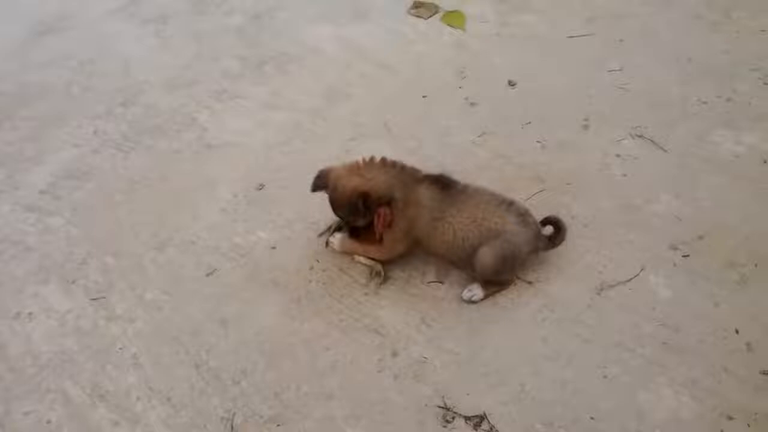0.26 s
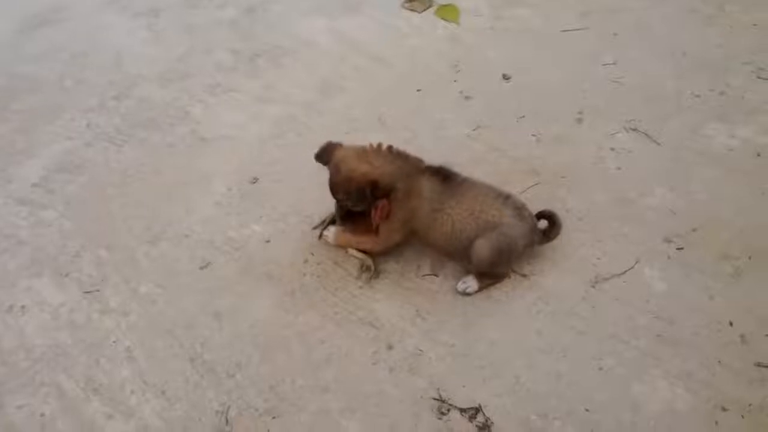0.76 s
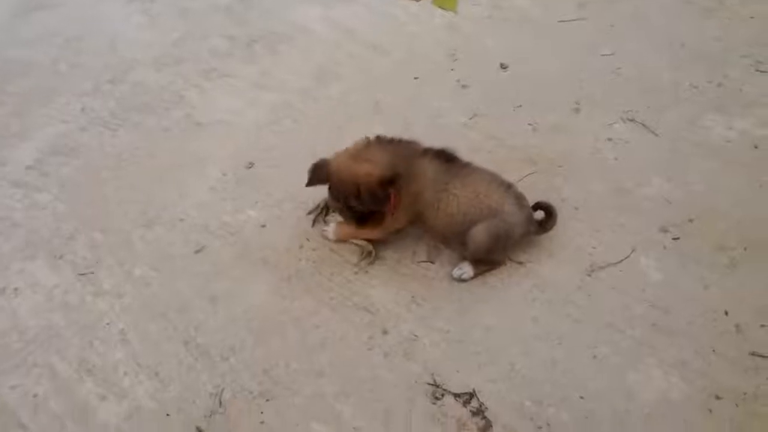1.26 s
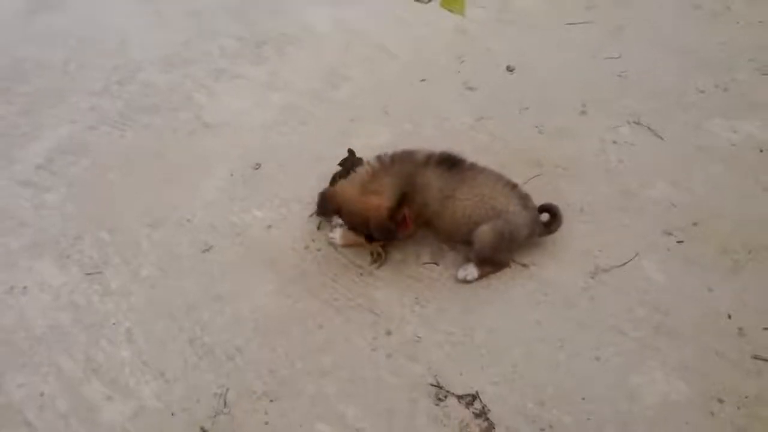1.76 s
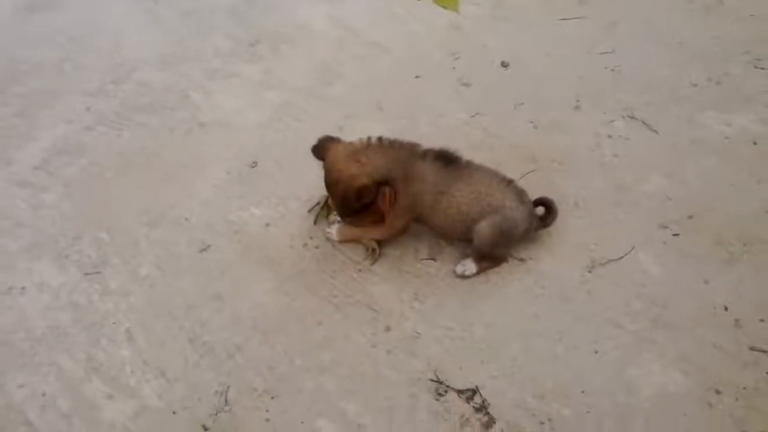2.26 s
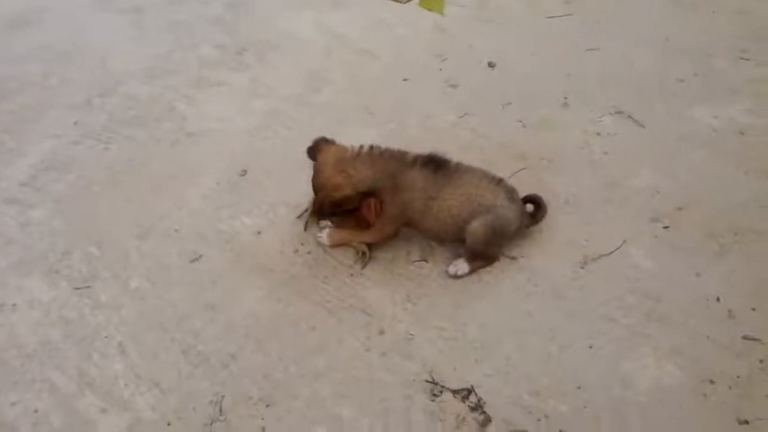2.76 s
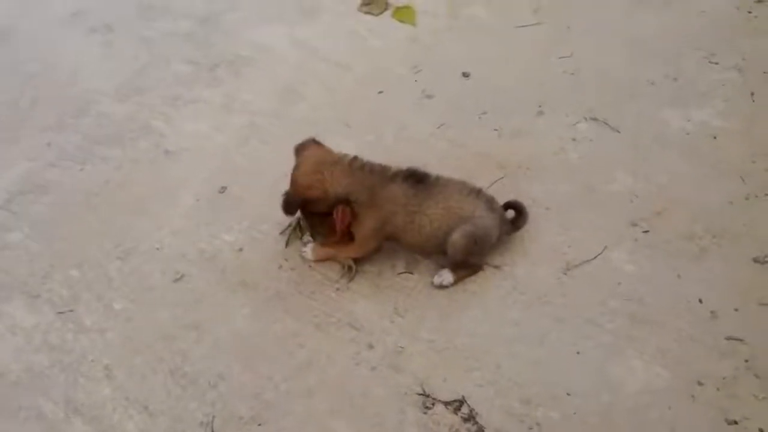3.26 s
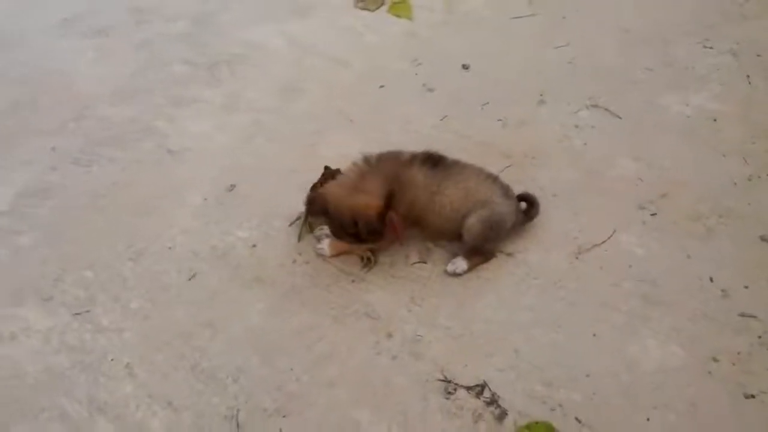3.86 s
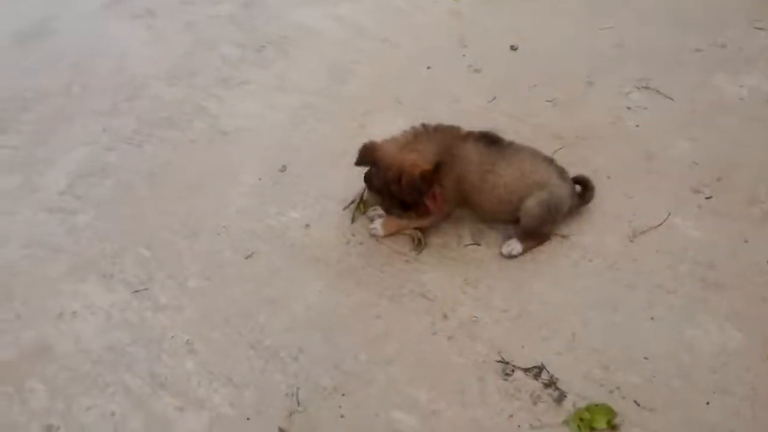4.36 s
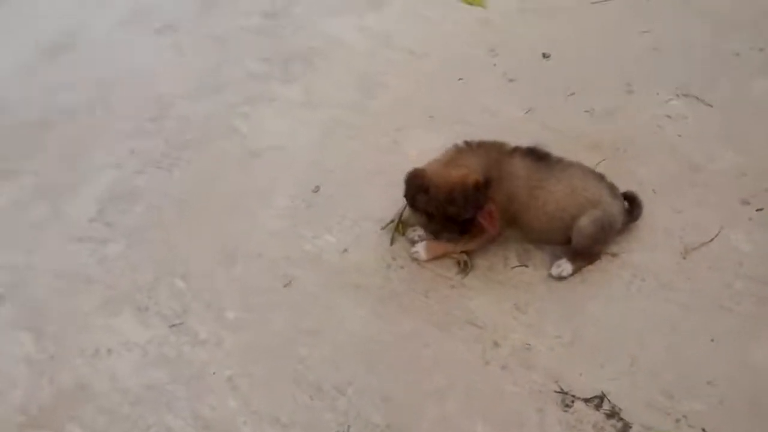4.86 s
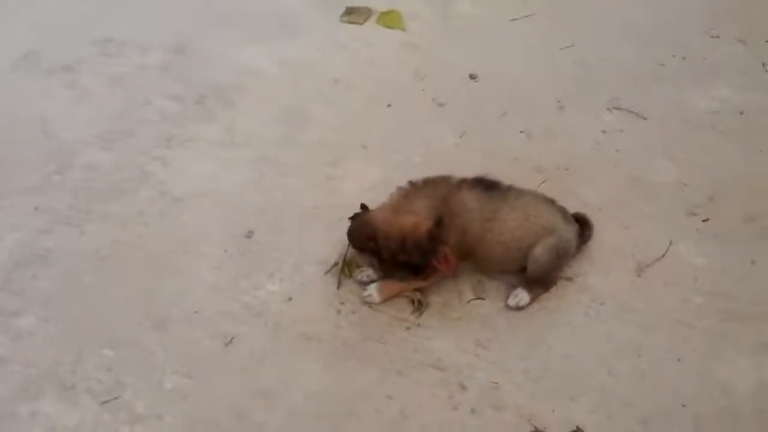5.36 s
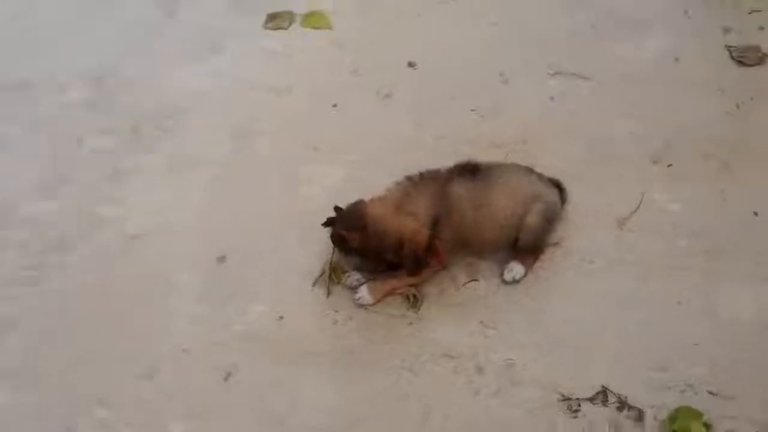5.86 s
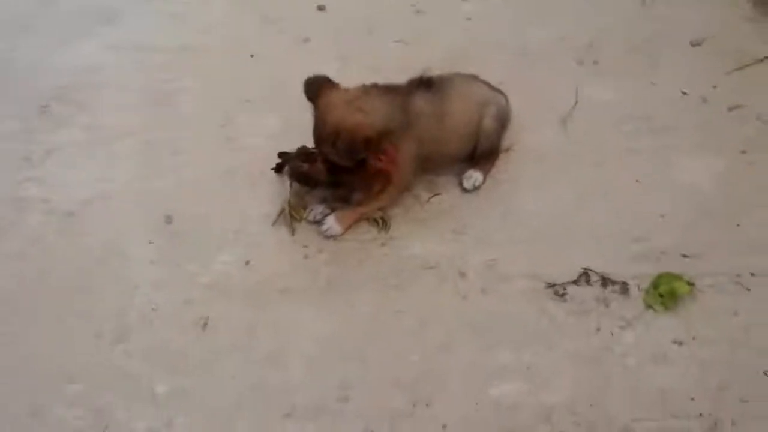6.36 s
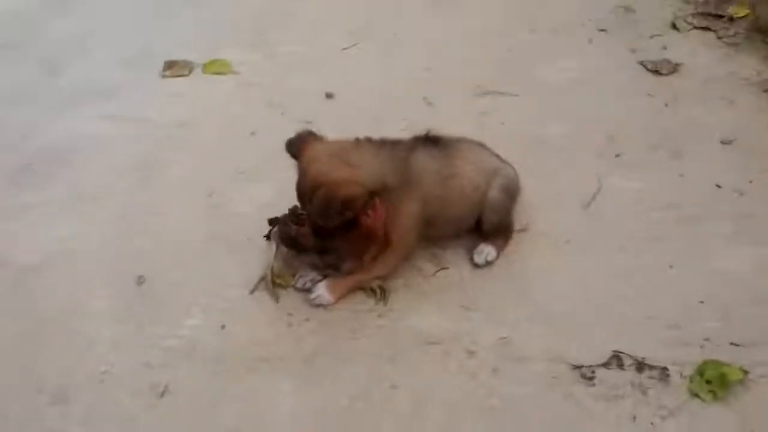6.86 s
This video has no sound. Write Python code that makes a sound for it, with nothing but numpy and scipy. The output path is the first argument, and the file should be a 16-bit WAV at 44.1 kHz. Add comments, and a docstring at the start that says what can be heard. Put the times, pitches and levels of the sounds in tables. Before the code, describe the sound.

Quiet open yard with faint high insect trilling and soft air rumble. A heavy dull thump repeats steadily, a bit more than once a second. After three seconds a rooster pinned by a puppy yelps, screams and gives a long cracking wail, nearby and loud. Then only thuds, tiny clicks and feather rustles remain. Handheld microphone outdoors, short echoes.

```python
"""Insects trill over quiet outdoor air, each a band of noise throbbing at the wing rate; scuffs are grainy noise.
Something heavy is pounded steadily some way off, as pressure pulses with damped modes; small birds glide faintly.
Then a rooster, held down by a puppy on a concrete road, squawks three times: a yelp, a scream and a long wail.
Its pulsed voice flips between a low and a high register, through resonances of windpipe and beak.
Around and after the calls teeth, claws, feathers and paws tick and rustle as filtered noise bursts."""
import sys
import numpy as np
from scipy import signal
from scipy.fft import rfft, irfft, next_fast_len
from scipy.io import wavfile
from scipy.ndimage import uniform_filter1d

SR = 44100
rng = np.random.default_rng(int(sys.argv[2]) if len(sys.argv) > 2 else 0)


def transcribe(u):
    """Save the signal u as a 16-bit wav file named by the first command-line argument.

    u: samples, shape (n,) or (channels, n), limited to [-1, 1]; the rate is SR.
    q: integer samples, one column per channel.
    """
    v = np.clip(np.atleast_2d(u).T, -1, 1)
    q = np.round(v * 32767).astype(np.int16)
    wavfile.write(sys.argv[1], SR, q)


N = 313992
TIME = np.arange(N) / SR
EDGE_HZ = 15800  # upper band limit

# Spectrum of the outdoor air. Each row: frequency in Hz, relative density in dB per Hz.
AIR_SPECTRUM = [(12, -50), (20, 1), (43, -2), (90, -3), (234, -5.5), (459, -12), (923, -18.5),
                (3630, -24.5), (5380, -25), (6700, -19.5), (7700, -24), (9140, -28), (12800, -23.5),
                (16000, -23.5)]
AIR_DB = -55
# Reverberation of the yard. Each row: frequency in Hz, time to fall by 60 dB in seconds.
YARD_DECAY = [(80, 0.5), (300, 0.49), (800, 0.21), (2000, 0.32), (5000, 0.34), (14000, 0.071)]
# Bouts of the main insect. Each row: start in seconds, end in seconds.
TRILL_BOUTS = [(-.2, 1.9), (2.5, 6.8), (6.85, 8.7)]
# Bouts of a thinner insect rasp. Each row: start in seconds, end in seconds.
THIN_TRILL_BOUTS = [(.5, 0.81), (2.5, 3.4)]
BOUT_EDGE_S = 0.035
# Whistles of small far birds. Each row: start in seconds, length in seconds, start and end pitch in Hz.
BIRD_CHIRPS = [(0.57, 0.078, 815, 770), (1.348, 0.053, 2770, 3450), (1.48, 0.14, 3390, 2900),
               (1.838, 0.096, 4350, 4800), (6.331, 0.06, 3090, 3560), (6.653, .14, 7600, 7250)]
CHIRP_DB = -64.5

# Distant blows. Each row: time in seconds, level in dB, pitch of the push in Hz, hardness in dB,
# rebound in dB relative to the blow.
BLOWS = [(0.278, -17.5, 115, 3, -15), (1.1612, -20.5, 105, -4.5, -12), (2.054, -26, 89, -11, -7),
         (2.942, -21, 105, -5.5, -23), (3.8298, -21, 106, 7, -14.5), (4.7001, -22, 109, 3.5, -18),
         (5.5962, -19.5, 118, 6, -24), (6.494, -18.5, 111, -8, -11.5)]
# Modes of the struck body. Each row: highest frequency in Hz, level in dB before hardness,
# time to fall by 60 dB in seconds.
BLOW_MODES = [(77.4, -10, 0.21), (170, -29, 0.025), (262.6, -14.5, 0.11), (417.6, -19.5, 0.13)]
REBOUND_S = 0.055  # delay of the rebound
KNOCK_DB, RING_SHARE = -24, 0.16  # a hard blow knocks more; this share of its hardness also goes to the ring

# Scuffs of feathers and paws. Each row: centre in seconds, level in dB, length in seconds,
# grit from 0 (soft swish) to 1 (coarse).
SCUFF_EVENTS = [(0.033, -42.5, .015, 0.01), (1.07, -56, 0.065, 0.1), (2.99, -49.5, 0.021, 0.45),
                (4.841, -40, 0.025, 0.45), (5.906, -45.5, 0.022, 0.77), (5.986, -47.5, 0.048, 0.74),
                (6.082, -45.5, 0.051, 0.53), (6.1, -34.5, 0.01, 0.41), (6.442, -45.5, 0.011, 0.1),
                (6.511, -42.5, 0.1, 0.49)]
# Spectra of feathers and of grit. Each row: frequency in Hz, relative gain in dB.
SWISH_SPECTRUM = [(300, -8), (2000, -42), (4000, -16.5), (8000, -7), (11000, 1), (14500, 8.0), (16000, 1)]
GRAVEL_SPECTRUM = [(100, 15.5), (900, 6.5), (2500, 2), (4300, 4.5), (6000, -5.0), (15000, -10.5)]
# Sharp clicks of teeth and claws. Each row: time in seconds, peak in dB, centre in Hz,
# width in octaves, decay of the burst in seconds.
TOOTH_CLICKS = [(2.667, -26.5, 13300, 1.6, .0014), (2.981, -18.5, 14600, 0.48, 0.00093),
                (3.367, -32.5, 12000, 2.1, 0.00094), (5.847, -37, 10060, 1.1, .001),
                (5.912, -28.5, 5900, 0.95, .0012), (6.0469, -22, 12500, 2.1, 0.00042),
                (6.1025, -11.5, 12000, 0.75, .00008), (6.155, -29.5, 12000, .4, 0.0016),
                (6.435, -40, 12000, 1.2, .0012), (7.0561, -25, 12500, 1.4, 0.00078)]
# Pitched pops and squeaks of quills and beak. Each row: time in seconds, peak in dB,
# frequency in Hz, decay of the burst in seconds.
QUILL_POPS = [(3.525, -27.5, 3430, 0.0087), (4.661, -34, 5420, 0.0037), (6.103, -33.5, 890, 0.0016),
              (6.155, -42.5, 4150, .002), (6.435, -34.5, 557, 0.0013), (6.6, -41.5, 1810, 0.0023),
              (6.648, -48, 1310, 0.0032), (6.998, -45, 1930, 0.0023)]
POP_SPREAD = 0.6  # width in Hz times decay in s: the longer it rings, the purer

# Low-register pitch of the yelp, which also stands for strain. Each row: time in seconds, pitch in Hz.
YELP_PITCH = [(3.083, 739), (3.11, 737.4), (3.135, 714.4), (3.168, 671), (3.185, 609), (3.245, 615)]
# The same for the scream. Each row: time in seconds, pitch in Hz.
SCREAM_PITCH = [(3.393, 599), (3.426, 629.3), (3.44, 746.5), (3.478, 770), (3.5, 733), (3.535, 755),
                (3.61, 740.6), (3.67, 761.4), (3.824, 751.2)]
# The same for the wail. Each row: time in seconds, pitch in Hz.
WAIL_PITCH = [(3.95, 616), (4.07, 612.7), (4.1, 633.5), (4.16, 719.6), (4.19, 731.4), (4.25, 707.4),
              (4.49, 695.6), (4.54, 712), (4.565, 729), (4.74, 727.7), (4.778, 628.6), (4.875, 599.5),
              (5.0, 588), (5.065, 617), (5.185, 640), (5.24, 686), (5.28, 637), (5.312, 691),
              (5.405, 702.5), (5.455, 630.3), (5.51, 526)]
# Resonances of windpipe and beak. Each row: frequency in Hz, width in Hz, relative gain in dB.
THROAT_MODES = [(770, 350, 12.5), (1432, 360, -18.5), (1810, 193, -12), (2680, 245, -22), (2975, 200, -8),
                (3240, 700, -17.5), (4083, 650, -6.5), (4650, 90, -14), (6760, 1400, -21.5),
                (8450, 1420, -23.5), (9870, 810, -22), (12040, 2700, -23), (14100, 1400, -20),
                (14600, 700, -38)]
# Resonances with the beak gaping widest. Each row: frequency in Hz, width in Hz, relative gain in dB.
WIDE_THROAT_MODES = [(819, 286, 23), (1400, 840, 0.5), (1997, 360, -5), (3450, 320, -32),
                     (4360, 1070, -24.5), (5130, 85, -32), (6140, 530, -33.5), (8250, 2550, -36.5),
                     (9700, 440, -42), (12000, 3700, -37), (14800, 1500, -36.5)]
# Level law of the fundamental. The row: low register in dB at STRAIN_HZ, its rise in dB per Hz of pitch,
# high register in dB.
FUNDAMENTAL_LAW = (-33.5, 0.21, -31)
# Level law of the middle overtones. The row: low register in dB, rise in dB per Hz, high register in dB.
MID_LAW = (-42, 0.082, -37.8)
# Level law of the shrill overtones. The row: low register in dB, rise in dB per Hz, high register in dB.
SHRILL_LAW = (-41, 0.043, -39)
STRAIN_HZ, SLACK_HZ = 700, 587  # reference pitch; pitch below which the voice gets no softer
# Leaps into the high register. Each row: start in seconds, end in seconds, roughness from 0 to 1,
# force of the fundamental in dB.
REGISTER_LEAPS = [(3.07, 3.101, 0.66, -6), (3.513, 3.531, 0.05, 6.5), (4.168, 4.511, .055, 0),
                  (4.553, 4.619, 0.26, 0.5), (4.651, 4.712, 0.31, -2.5), (4.743, 4.757, 0.6, -6),
                  (5.338, 5.391, 0.49, -8)]
LEAP_SHARE, FLIP_S = 0.216, 0.0025  # relative rise in pitch; time scale of a flip
FLIP_ROUGH, UNSTEADY_S = 0.23, 0.022  # added roughness around each flip, and its decay time
# Hoarse stretches, where the membranes lose their regular beat. Each row: start in seconds,
# end in seconds, roughness from 0 to 1, swell in dB.
HOARSE_STRETCHES = [(3.084, 3.26, 0.26, -3), (3.393, 3.431, 0.44, 0), (3.563, 3.84, 0.32, -2),
                    (3.944, 4.055, 0.92, 13), (4.756, 4.789, 0.44, 0), (4.916, 5.025, 0.7, 8.5),
                    (5.459, 5.496, 0.35, 12)]
HOARSE_EDGE_S = 0.0074
CRACK_S, CRACK_DIP_DB, CRACK_SPREAD_DB = 0.0105, -4, 2  # width of a crack, its mean dip and random spread


def amp(db):
    """Level law: a ratio in decibels becomes an amplitude gain."""
    return 10 ** (np.asarray(db) / 20)


def evened(x):
    """Normalization: equal mean power, at rms 1."""
    return x / np.sqrt(np.mean(x ** 2) + 1e-20)


def read(points, hz):
    """Interpolation of a spectrum on a logarithmic frequency axis."""
    f, value = np.transpose(points)
    return np.interp(np.log(hz + 1), np.log(f + 1), value)


def add(mix, s, sound):
    """Superposition: pressures add, from time s on."""
    part = mix[max(round(s * SR), 0):][:len(sound)]
    part += sound[:len(part)]


def shaped(x, gain):
    """Linear filtering: the spectrum is multiplied by a function of frequency."""
    size = next_fast_len(len(x) + 4096)
    f = np.arange(size // 2 + 1) * SR / size + 0.00076  # kept off zero, for gains that divide by f
    return irfft(rfft(x, size) * gain(f), size)[:len(x)]


def wander(count, hz):
    """Low-passed random fluctuation of rms 1, mostly slower than hz."""
    return evened(shaped(rng.standard_normal(count), lambda f: 1 / (1 + (f / hz) ** 4)))


def during(t, start, end, edge):
    """Gating: 1 between start and end, 0 outside, with soft edges."""
    return (np.tanh((t - start) / edge) - np.tanh((t - end) / edge)) / 2


def air(swell_db=1.0):
    """Broadband noise: quiet outdoor rumble and hiss of slightly wavering level."""
    noise = shaped(rng.standard_normal(N), lambda f: amp(read(AIR_SPECTRUM, f)))
    return amp(AIR_DB + swell_db * wander(N, 15.6)) * evened(noise)


def yard(x, gap_s=0.006):
    """Reverberation: scattered echoes from walls and ground, the extreme treble dying first."""
    arrives = rng.random(SR) < 2500 / SR  # on average 2500 echoes per second
    taps = rng.standard_normal(SR) * arrives * (np.arange(SR) > gap_s * SR)
    hz, t, spectrum = signal.stft(taps, SR, nperseg=256)
    decay = amp(-60 * t / read(YARD_DECAY, hz)[:, None])
    tail = signal.istft(spectrum * decay, SR, nperseg=256)[1]
    return signal.fftconvolve(x, tail / np.linalg.norm(tail))[:N]


def insect(bouts, bout_db, rest_db, centre_hz, width_hz, throb_hz=36.8, depth=0.65, sweep_hz=90):
    """Modulation: each wing stroke throbs and sweeps a narrow band of noise, which swells in bouts."""
    stroke = 2 * np.pi * np.cumsum(throb_hz * (1 + 0.0213 * wander(N, 2.2))) / SR
    carrier_hz = centre_hz + sweep_hz * np.sin(stroke) + 60 * wander(N, 1.1)
    carrier = 2 * np.pi * np.cumsum(carrier_hz) / SR
    buzz = wander(N, width_hz / 2) * np.cos(carrier) + wander(N, width_hz / 2) * np.sin(carrier)
    singing = sum(during(TIME, start, end, BOUT_EDGE_S) for start, end in bouts)
    level = amp(rest_db + (bout_db - rest_db) * singing)
    return level * evened(buzz * (1 + depth * np.cos(stroke)))


def birds():
    """Frequency glide: faint, nearly pure whistles whose phase sums a sliding, wavering pitch."""
    out = np.zeros(N)
    for s, length, start_hz, end_hz in BIRD_CHIRPS:
        count = int(length * SR)
        hz = np.linspace(start_hz, end_hz, count) * (1 + 0.015 * wander(count, 124))
        whistle = np.sin(2 * np.pi * np.cumsum(hz) / SR)
        add(out, s, amp(CHIRP_DB) * np.hanning(count) * whistle)
    return out


def pounding(lead=0.012, knock_hz=620, knock_s=0.014, boom_db=-21, boom_s=0.047, lowest_hz=53,
             swish_db=-51, swish_s=0.049, swish_hz=9500):
    """Impact: a push of air excites damped modes and noise, and a weaker, duller rebound follows."""
    out = np.zeros(N)
    t = np.arange(SR // 3) / SR - lead
    after = np.maximum(t, 0)
    contact = (1 + np.tanh((t + 0.0013) / 0.00026)) / 2

    def burst(gain, decay_s):
        return evened(shaped(rng.standard_normal(len(t)), gain)) * np.exp(-after / decay_s)

    for s, db, push_hz, hard_db, rebound_db in BLOWS:
        u = (np.pi * push_hz * t) ** 2
        push = 0.74 * (1 - 2 * u) * np.exp(-u)
        ring = np.zeros(len(t))
        for hz, mode_db, t60 in BLOW_MODES:
            decay = amp(mode_db + RING_SHARE * hard_db - 60 * after / t60)
            ring += decay * np.cos(2 * np.pi * hz * rng.uniform(0.922, 1.0) * t)
        knock = amp(KNOCK_DB + hard_db) * burst(lambda f: 1 / (1 + (f / knock_hz) ** 3), knock_s)
        boom = amp(boom_db) * burst(lambda f: 1 / (1 + (f / 380) ** 8), boom_s)
        swish = amp(swish_db) * burst(lambda f: 1 / (1 + (swish_hz / f) ** 2), swish_s)
        swish *= np.minimum(1 + t / lead, 1)  # rises before the contact
        blow = amp(db) * (push + (ring + boom + knock) * contact)
        rebound = amp(rebound_db) * shaped(blow, lambda f: 1 / (1 + (f / 260) ** 4))
        add(out, s - lead, blow + swish)
        add(out, s - lead + REBOUND_S, rebound)
    return shaped(out, lambda f: 1 / (1 + (lowest_hz / f) ** 4))


def scuffs(grain_db=4.0):
    """Friction: many random grains make noise, bright for feathers and coarser for paws on grit."""
    grain_level = grain_db * np.minimum(rng.exponential(1, N), 5) + 2.3 * wander(N, 170)
    grains = rng.standard_normal(N) * amp(grain_level)
    soft = evened(shaped(grains, lambda f: amp(read(SWISH_SPECTRUM, f))))
    coarse = evened(shaped(grains, lambda f: amp(read(GRAVEL_SPECTRUM, f))))
    out = np.zeros(N)
    for s, db, length, grit in SCUFF_EVENTS:
        near = abs(TIME - s) < 2 * length
        envelope = np.exp(-2 * ((TIME[near] - s) / length) ** 2)
        out[near] += amp(db) * envelope * ((1 - grit) * soft[near] + grit * coarse[near])
    return out


def tick(s, db, decay, colour, snap=4.0):
    """Transient: an impulse and a tiny decaying noise burst, coloured by a band filter."""
    t = (np.arange(2048) - 256) / SR
    burst = snap * (t == 0) + rng.standard_normal(len(t)) * (t > 0) * np.exp(-abs(t) / decay)
    sound = shaped(burst, colour)
    return s + t[0], amp(db) * sound / abs(sound).max()


def ticks():
    """Bandwidth: a broad band gives a click, a narrow one a pitched pop."""
    out = np.zeros(N)
    for s, db, hz, octaves, decay in TOOTH_CLICKS:
        add(out, *tick(s, db, decay, lambda f: np.exp(-0.5 * (np.log2(f / hz) / octaves) ** 2)))
    for s, db, hz, decay in QUILL_POPS:
        add(out, *tick(s, db, decay, lambda f: np.exp(-0.5 * ((f - hz) * decay / POP_SPREAD) ** 2)))
    return out


def resonances(modes):
    """Minimum-phase resonance: steep-sided peaks that ring after each pulse."""
    def response(f):
        gain = sum(amp(db) / (1 + (2 * (f - hz) / width) ** 2) ** 1.98 for hz, width, db in modes)
        log_gain = np.log(gain + 1e-5)
        mirrored = np.concatenate([log_gain, log_gain[-2:0:-1]])
        lag = signal.hilbert(mirrored).imag[:len(f)]  # the phase that belongs to this gain
        return gain * np.exp(-1j * lag)
    return response


def registers(t):
    """Register change: share of high voice, roughness, and the dB changes of hoarseness and leaps."""
    high, rough, swell_db, leap_db = np.zeros((4, len(t)))
    for start, end, roughness, db in REGISTER_LEAPS:
        up = during(t, start, end, FLIP_S)
        near_flip = np.exp(-np.minimum(abs(t - start), abs(t - end)) / UNSTEADY_S)
        high += up
        leap_db += up * db
        rough += up * (roughness + FLIP_ROUGH * near_flip)
    for start, end, roughness, db in HOARSE_STRETCHES:
        hoarse = during(t, start, end, HOARSE_EDGE_S)
        rough += roughness * hoarse
        swell_db += db * hoarse
    return high, rough, swell_db, leap_db


def cracks(t, rattle):
    """Relaxation: tension climbs up to each crack, the voice breaks and dips, and starts low again."""
    broken, climb, dip_db = np.zeros((3, len(t)))
    if rattle:
        first, end, rate = rattle
        for s in np.arange(first, end, 1 / rate):
            u = 2 * (t - s) / CRACK_S
            crack = np.exp(-u ** 4)
            broken += crack
            climb -= u * np.exp(-(u / 2) ** 2)
            dip_db += crack * (CRACK_DIP_DB + CRACK_SPREAD_DB * rng.uniform(-1, 1))
    return broken, climb, dip_db


def syrinx(t, hz, rough, jitter=0.073, jitter_hz=260, waver=0.004, shimmer=0.67, limp=0.07, rasp=0.37,
           hiss=0.0014, swell_db=0.66, sizzle=0.27):
    """Self-oscillation: membrane pulses, which roughness makes uneven in time and size, and raspy."""
    count = len(t)
    unevenness = jitter * rough * wander(count, jitter_hz) + waver * wander(count, 57)
    turns = np.cumsum(hz * (1 + unevenness)) / SR
    # in a high or rough voice alternate pulses come early and late: half-way lines between the overtones
    high = (1 + np.tanh((hz - 800) / 30)) / 2
    limping = limp * (high + rough) / 2 * (1 + 0.64 * wander(count, 27))
    turns = turns + limping * np.sin(np.pi * turns)
    pulses = np.zeros(count)
    for k in range(1, 28):
        # each overtone swells and fades on its own as the neck is twisted about, the upper ones most
        swell = amp(swell_db * min(k - 1, 10) * wander(count, 14.6))
        pulses += swell * np.cos(2 * np.pi * k * turns) * (k * hz < EDGE_HZ)
    pulses = evened(pulses) * (1 + rough * shimmer * wander(count, 134))
    # air escapes in a puff each cycle; the high voice adds a shrill sizzle
    puffs = evened((1 + np.cos(2 * np.pi * turns)) * rng.standard_normal(count))
    shrill = shaped(puffs, lambda f: 1 / (1 + (2700 / f) ** 6))
    return pulses + (hiss + rasp * rough) * puffs + sizzle * high * shrill


def squawk(pitch, throat, attack_s, release_s, rough, level_db, shrill_db, tire_db_per_s=0, rattle=None,
           crack_leap=0, crack_rough=0.4, crack_climb=0.027):
    """Source and filter: syrinx through throat; strain swells the fundamental more than the overtones."""
    t = np.arange(pitch[0][0], pitch[-1][0], 1 / SR)
    low_hz = np.interp(t, *np.transpose(pitch))
    high, hoarse, swell_db, leap_db = registers(t)
    broken, climb, dip_db = cracks(t, rattle)
    hz = low_hz * (1 + LEAP_SHARE * high + crack_leap * broken + crack_climb * climb)
    sound = shaped(syrinx(t, hz, rough + hoarse + crack_rough * broken), resonances(throat))

    def below(edge):
        return shaped(sound, lambda f: 1 / (1 + (f / edge) ** 24))

    strain = np.maximum(low_hz, SLACK_HZ) - STRAIN_HZ

    def part(x, law):
        """Gain law: a band levelled by its running power, then set by strain and register."""
        low_db, rise, high_db = law
        power = uniform_filter1d(uniform_filter1d(x ** 2, size=900), size=900)
        level = amp((1 - high) * (low_db + rise * strain) + high * high_db)
        return x / np.sqrt(abs(power) + 1e-12) * level

    low, body = below(1080), below(2400)
    call = part(low, FUNDAMENTAL_LAW) * amp(swell_db + dip_db + leap_db)
    call += part(body - low, MID_LAW) * amp((swell_db + dip_db) / 2)
    call += part(sound - body, SHRILL_LAW) * amp(shrill_db)
    envelope = np.clip(np.minimum((t - t[0]) / attack_s, (t[-1] - t) / release_s), 0, 1) ** 1.48
    return t[0], amp(level_db + tire_db_per_s * (t - t[0])) * call * envelope


def rooster():
    """Vocal-tract shaping: three calls, the beak gaping widest in the scream."""
    out = np.zeros(N)
    # rattle: start of the crack count in s, its end in s, cracks per s; only cracks within the call sound
    add(out, *squawk(YELP_PITCH, THROAT_MODES + [(4800, 480, -21)], attack_s=0.025, release_s=0.057,
                     rough=0.045, level_db=0.5, shrill_db=-1.5, rattle=(2.6, 3.176, 45), crack_leap=0.11))
    add(out, *squawk(SCREAM_PITCH, WIDE_THROAT_MODES, attack_s=0.022, release_s=0.031,
                     rough=0.041, level_db=0.47, shrill_db=-3.5, rattle=(3.577, 3.795, 28), crack_leap=0.23))
    add(out, *squawk(WAIL_PITCH, THROAT_MODES, attack_s=0.14, release_s=0.021,
                     rough=0.07, level_db=0.0, shrill_db=-0.82, tire_db_per_s=-0.28))
    return out


def scene():
    """Superposition of near struggle and far sounds, with their echoes, in one open yard."""
    insects = insect(TRILL_BOUTS, bout_db=-67.5, rest_db=-85.5, centre_hz=6570, width_hz=600)
    insects += insect(THIN_TRILL_BOUTS, bout_db=-71, rest_db=-94, centre_hz=7740, width_hz=450, depth=0.2)
    chirps = birds()
    thuds = pounding()
    struggle = scuffs() + ticks()
    voice = rooster()
    echoes = yard(amp(-8.5) * voice + amp(-17.5) * thuds + amp(-14.5) * struggle + amp(-9) * chirps)
    return (voice + thuds + struggle + chirps + echoes + insects + air())[None]


def record(dry):
    """Band limitation: the recorder's low-pass filter."""
    lowpass = signal.firwin(255, EDGE_HZ, window=("kaiser", 9), fs=SR)
    return signal.oaconvolve(dry, lowpass[None], "same")


dry = scene()
out = record(dry)
transcribe(out)
```